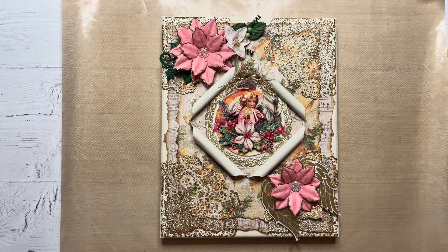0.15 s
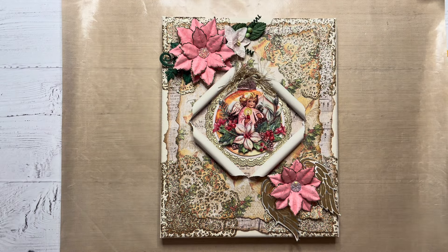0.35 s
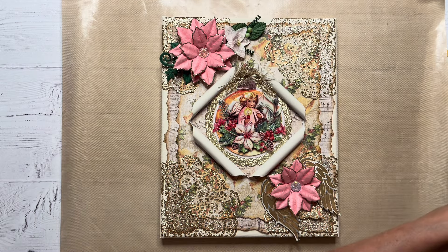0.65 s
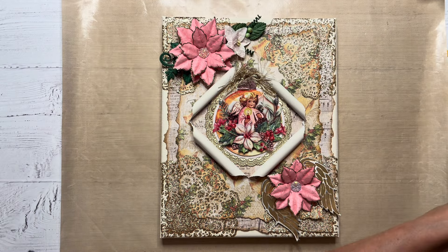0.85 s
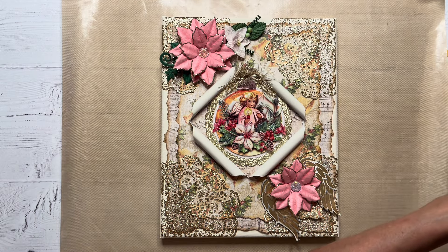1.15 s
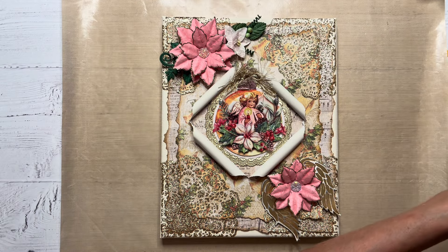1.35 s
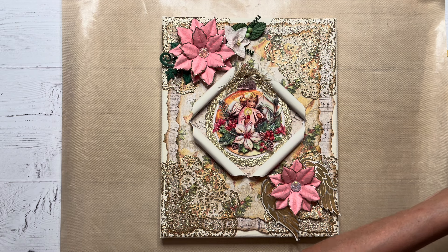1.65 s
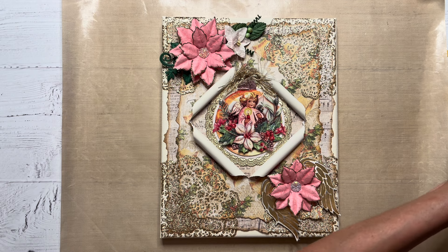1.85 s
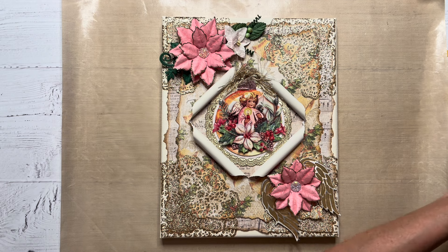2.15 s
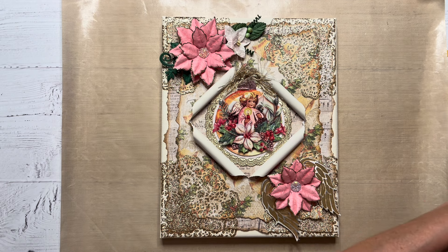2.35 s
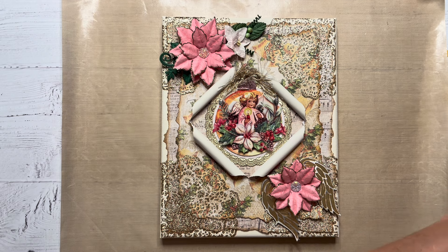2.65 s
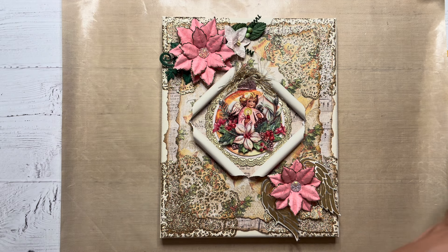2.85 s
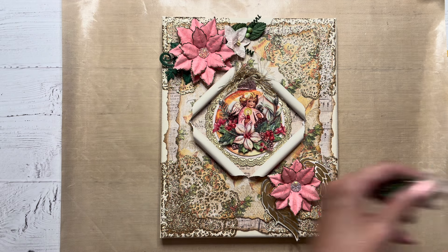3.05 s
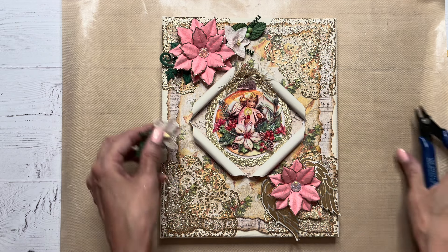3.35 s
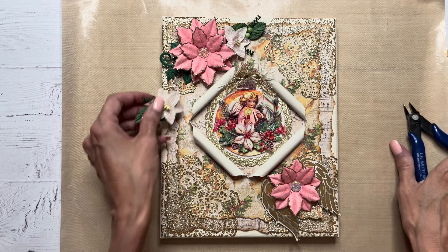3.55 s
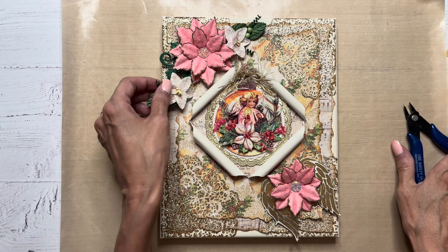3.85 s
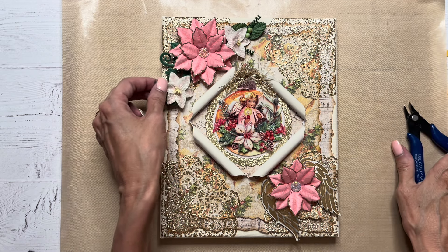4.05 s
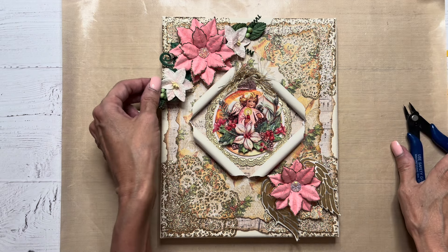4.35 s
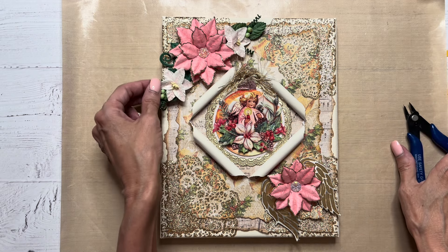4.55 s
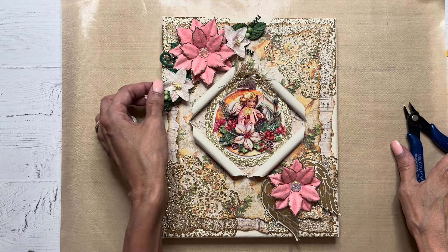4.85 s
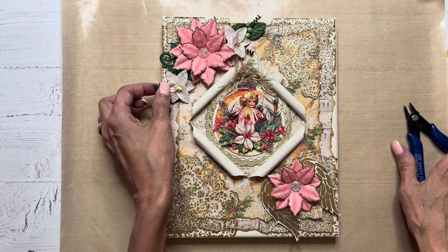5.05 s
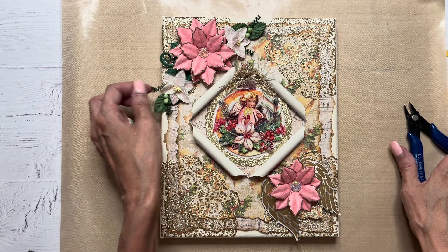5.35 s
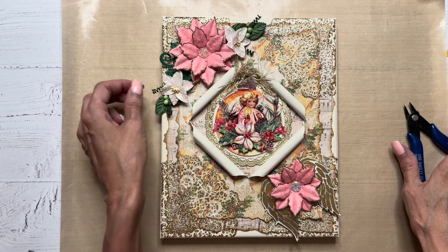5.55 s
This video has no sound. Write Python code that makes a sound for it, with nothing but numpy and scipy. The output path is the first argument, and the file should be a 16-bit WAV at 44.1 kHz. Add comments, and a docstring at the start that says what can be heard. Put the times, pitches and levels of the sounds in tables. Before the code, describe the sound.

Close above a craft table in a small furnished room with low ventilation rumble, fingers faintly rustle a fabric flower. Tiny ticks gather until cutters snap a wire stem with one loud, bright snip and short room tail. About a second later the tool is laid down with a duller, woody cluster of knocks and steel rattle, followed by very soft scraping on card.

```python
"""A quiet craft room, phone above the table. Fingers turn a fabric flower: uneven grains of filtered noise.
Cutter jaws bite its wire stem in small ticks, pitched or dry, and snap through with a falling ring and a grind.
The cutters are laid down (fading board modes, steel rattle) and the flower is nudged about on a card.
Ventilation rumbles throughout as steady noise; a small furnished room answers every hit with fading noise."""
import sys
import numpy as np
from scipy import signal
from scipy.fft import rfft, irfft, next_fast_len
from scipy.io import wavfile
from scipy.ndimage import uniform_filter1d

SR = 44100
rng = np.random.default_rng(int(sys.argv[2]) if len(sys.argv) > 2 else 0)


def unload_wav(signal):
    """Save mono or channel-first audio to the path in sys.argv[1] as 16-bit WAV at rate SR, clipped to [-1, 1]."""
    wavfile.write(
        sys.argv[1],
        SR,
        np.round(np.clip(np.atleast_2d(signal).T, -1, 1) * 32767).astype(np.int16),
    )


N = 251059
SIZE = next_fast_len(N + SR)  # room for the tails of the filters
HZ = np.arange(SIZE // 2 + 1) * SR / SIZE
T = np.arange(N) / SR

# strokes of the fingers over the flower, and at 3.958 s a brief hiss of the cutters' steel as they are laid
# down: start t/s, length/s, petal hiss level/dB, scrape level/dB
STROKES = [(0.0, 0.0076, -71, -69), (0.231, 0.078, -68.5, -70.5), (0.299, 0.038, -56.5, -71),
           (0.375, 0.043, -56.5, -65), (0.627, 0.034, -75, -79), (0.742, 0.061, -62, -68.5),
           (0.96, 0.076, -69, -78.5), (1.475, 0.022, -66, -79), (1.626, .12, -72, -81),
           (1.762, .13, -59.5, -63.5), (2.041, 0.05, -67.5, -70.5), (2.207, 0.14, -69, -68.5),
           (2.608, 0.025, -65.5, -75), (2.973, 0.037, -72.5, -69.5), (3.1, 0.055, -69.5, -74),
           (3.313, 0.037, -73, -65.5), (3.383, 0.072, -79.5, -64), (3.543, 0.06, -65.5, -67.5),
           (3.593, 0.024, -60, -63.5), (3.758, 0.073, -60.5, -66), (3.958, 0.0051, -65, -63),
           (4.026, 0.005, -64, -69.5), (4.22, 0.05, -88, -77), (4.409, 0.018, -86.5, -76),
           (4.66, 0.025, -78.5, -71), (4.76, 0.043, -83, -65), (4.873, 0.02, -72, -64.5),
           (5.12, 0.033, -84.5, -71), (5.325, 0.029, -70.5, -65.5), (5.391, 0.058, -72.5, -73.5)]


def undb(db):
    """Decibels to amplitude."""
    return 10 ** (np.asarray(db) / 20)


def over_hz(table):
    """A (f/Hz, value) table on every bin, straight on a log axis."""
    hz, value = np.transpose(table)
    return np.interp(np.log(HZ + 1), np.log(hz), value)


def shape(x, gain):
    """Filter by a gain on every bin."""
    return irfft(rfft(x, SIZE) * gain, SIZE)[..., :N]


def unit(x):
    """Scale to an RMS of one."""
    return x / np.sqrt(np.mean(x ** 2))


def colour(table):
    """A (f/Hz, level/dB) spectrum as gains that keep the power of white noise."""
    return unit(undb(over_hz(table)))


def burst(since, rise_s, t60):
    """Envelope of a short noise: quick rise, then fading."""
    return np.clip(since / rise_s, 0, 1) * undb(-60 * np.maximum(since, 0) / t60)


def ring(modes, since):
    """Fading sines, silent before the blow."""
    t = np.maximum(since, 0)
    return sum(undb(db - 60 * t / t60) * np.sin(2 * np.pi * hz * t) for hz, db, t60 in modes)


def grains(rate, spread_db, smear_s):
    """Rubbing: tiny catches of very uneven size, each smeared into a short puff of noise."""
    catch = (rng.random(N) < rate / SR) * undb(spread_db * rng.exponential(size=N))
    puff = signal.lfilter([1], [1, -np.exp(-1 / (smear_s * SR))], catch)
    # a steady floor keeps the rubbing from falling silent between catches
    return unit(puff + 0.54 * puff.mean()) * rng.standard_normal((2, N))


def diffuse(a, b):
    """Two unrelated sounds spread over both ports, as alike as sound from all sides arrives."""
    # likeness of the two microphone ports: f/Hz, likeness (0-1)
    alike = [(100, 1), (250, 0.99), (600, 0.4), (1100, 0), (1800, 1), (3000, 0.4), (5300, 0.5),
             (6000, 0.98), (7000, 0.5), (9000, 1), (12000, 1)]
    likeness = np.clip(over_hz(alike), 0, 1)
    common = shape(a, np.sqrt((1 + likeness) / 2))
    opposed = shape(b, np.sqrt((1 - likeness) / 2))
    return common + opposed * np.array([[1], [-1]])


def air():
    """Ventilation rumble and the faint hiss of the room: steady noise with a fixed spectrum."""
    # background spectrum: f/Hz, level/dB per Hz
    air_spectrum = [(25, -94.5), (50, -76), (80, -77.5), (110, -67.5), (138, -64), (163, -75.5), (190, -69),
                    (250, -82), (305, -76.5), (370, -90.5), (430, -84), (520, -91.5), (800, -95.5),
                    (1200, -103), (2500, -108), (4700, -123), (7000, -120), (11300, -120), (12600, -128),
                    (13400, -145)]
    noise = diffuse(*rng.standard_normal((2, N)))
    return shape(noise, undb(over_hz(air_spectrum)) * np.sqrt(SR / 2))


def strokes(level_db):
    """Level of the rubbing: every stroke rises, holds and falls; overlapping strokes add in power."""
    rise_db_s, fall_db_s = 603, 203.5  # a stroke catches quickly and dies away slowly
    power = np.zeros(N)
    for (start_s, length_s, _, _), db in zip(STROKES, level_db):
        before_db = np.maximum(rise_db_s * (start_s - T), 0)
        after_db = np.maximum(fall_db_s * (T - start_s - length_s), 0)
        power += undb(db - before_db - after_db) ** 2
    return np.sqrt(power)


def handling():
    """Fabric petals hiss under the fingers; wire and leaves scrape in a lower, wider band."""
    # hiss of the petals: f/Hz, level/dB
    petal_spectrum = [(3000, -30), (6000, -18), (8000, -8.5), (9300, 2.5), (10800, 4), (11800, -12.5),
                      (12600, -18), (13300, -46.5)]
    # scrape on skin and card: f/Hz, level/dB
    scrape_spectrum = [(1000, -20), (2500, -2), (4600, -9.5), (6000, -6), (7500, -1.5), (9500, -2.5),
                       (11800, -20.5), (13300, -35)]
    # from card_s on the flower rubs the card, which adds a resonance
    card_s, card_hz, card_width_hz, card_db = 3.94, 3800, 400, 6.5
    _, _, petal_db, scrape_db = np.transpose(STROKES)
    petals = shape(diffuse(*grains(350, 3.4, 0.0045)), colour(petal_spectrum))
    scrape = shape(diffuse(*grains(300, 2.8, 0.004)), colour(scrape_spectrum))
    card = shape(scrape, undb(card_db) / (1 + (2 * (HZ - card_hz) / card_width_hz) ** 2))
    scrape = scrape + (T > card_s) * card
    return petals * strokes(petal_db) + scrape * strokes(scrape_db)


def ticks():
    """A short pitched knock or a broad dry click, each with a burst of crackle."""
    # small pitched ticks of stem, jaws and petals, and at 3.958 s a low knock of the cutters laid on the table:
    # t/s, knock level/dB, knock f/Hz, crackle level/dB
    pitched = [(1.224, -57.5, 2210, -44), (1.46, -41, 2310, -26.5), (1.8348, -58, 2430, -38.5),
               (1.99, -56, 2410, -50), (2.2475, -36.5, 2120, -30.5), (2.258, -41, 2560, -37),
               (2.604, -50.5, 2130, -39.5), (2.617, -54, 1980, -42.5), (3.958, -50, 630, -46),
               (4.479, -60, 2000, -61), (4.745, -57, 2254, -60), (4.8736, -55, 3800, -51)]
    # dry clicks without a pitch: t/s, click level/dB, lower edge f/Hz, crackle level/dB
    dry_clicks = [(0.2264, -42, 2600, -43), (0.441, -54, 1500, -50), (1.748, -54, 1500, -40),
                  (1.8716, -59, 1800, -31), (2.0527, -53.5, 2300, -43), (2.189, -56.5, 2300, -53),
                  (2.224, -53.5, 2300, -54), (2.271, -40.5, 2100, -30.5), (2.3077, -44, 2097, -32),
                  (2.416, -60, 2000, -35), (2.836, -61, 1400, -41.5), (3.2969, -44, 1300, -46),
                  (3.3754, -41.5, 940, -42.5), (3.543, -52, 2100, -44), (3.557, -56, 1700, -38),
                  (4.936, -53, 600, -62)]
    # crackle: f/Hz, level/dB
    crackle_spectrum = [(2500, -21.5), (4200, -3.5), (6000, -7.5), (8000, 5.5), (9500, 17), (11200, 12),
                        (12500, -7.5), (15000, -31), (16500, -40)]
    swell_cycles = 1.7  # width of the knock's swell, alike on the way up and down
    reach = 2.6  # upper edge of a click as a multiple of the lower
    click_t60_s, crackle_t60_s = .008, .011
    knock, crackle = np.zeros(N), np.zeros(N)
    t = T[:1024]
    f = np.arange(len(t) // 2 + 1) * SR / len(t)
    events = pitched + dry_clicks
    noise = rng.standard_normal((len(events), 2, len(t)))
    for k, ((s, knock_db, hz, crackle_db), (crackle_noise, click_noise)) in enumerate(zip(events, noise)):
        i = int(s * SR)
        band = 1 / np.sqrt((1 + (hz / (f + 1)) ** 6) * (1 + (f / hz / reach) ** 4))
        hit = unit(irfft(rfft(click_noise) * band)) * burst(t, 0.0006, click_t60_s)
        if k < len(pitched):
            swell = np.exp(-.5 * (t * hz / swell_cycles - 1.6) ** 2)
            hit = swell * np.sin(2 * np.pi * hz * t) + undb(-7) * hit
        knock[i:i + len(t)] += undb(knock_db) * hit
        crackle[i:i + len(t)] += undb(crackle_db) * burst(t, 0.00089, crackle_t60_s) * crackle_noise
    return knock + shape(crackle, colour(crackle_spectrum))


def snip():
    """The wire parts and rings, the jaws slam: near sound on both ports, and the click sent into the room."""
    # bright grind of the closing jaws: f/Hz, level/dB
    slam_spectrum = [(3000, -36), (4400, -4), (5200, 3), (7000, 0), (8200, -3), (9200, -2), (11200, -2),
                     (11900, -17), (15500, -42)]
    # jolt in hands and handles: f/Hz, level/dB, t60/s
    thump_modes = [(447.6, -23, 0.0058), (680, -26, 0.0088), (1100, -26, 0.0095)]
    # the snap summed over all directions: f/Hz, level/dB
    snap_spectrum = [(300, -11.5), (1500, -16), (2200, 0), (3500, -5.5), (8000, -5), (11000, -5)]
    # two hard surfaces return the ring distinctly: delay t/s, level/dB
    ring_echoes = [(.0103, -19), (.0130, -20)]
    snip_s, snap_db = 2.31945, 5
    whip_db, whip_hz, whip_drop_hz, whip_t60_s = 2.5, 2480, 1300, .0062  # whip_hz is the end pitch
    slam_db, slam_s = -9.5, .0013  # level and swell time
    mat_echo_s, mat_echo_db = .0014, -5.5
    t = np.maximum(T - snip_s, 0)
    # tension is gone at once, so the pitch drops within a few cycles
    turns = whip_hz * t + whip_drop_hz * 0.00044 * (1 - np.exp(-t / 0.00043))
    whip = undb(whip_db) * burst(t, .0005, whip_t60_s) * np.sin(2 * np.pi * turns)

    grind = shape(rng.standard_normal(N), colour(slam_spectrum))
    swell = np.clip(t / slam_s, 0, 1) ** 2 * undb(-60 * np.maximum(t - slam_s, 0) / 0.0014)
    linger = undb(-18.5) * burst(t, slam_s, 0.026)
    slam = undb(slam_db) * grind * (swell + linger)

    echo = np.roll(slam + 0.14 * whip, int(mat_echo_s * SR)) * undb(mat_echo_db)
    for delay_s, db in ring_echoes:
        echo = echo + undb(db) * np.roll(whip, int(delay_s * SR))
    # the hands sit to one side of the phone's ports
    thump = ring(thump_modes, t - .0015) * undb([[0], [-9.0]])
    click = shape(np.arange(N) == int(snip_s * SR), undb(snap_db + over_hz(snap_spectrum)))
    return whip + slam + echo + thump, click


def knocks():
    """Steel rattles through the air at once; in the board bending waves travel slower the lower they are."""
    # cutters laid on the table: t/s, blow level/dB, steel level/dB, travel in the board/(s x root Hz),
    # contact/ms, favoured pitch of this spot f/Hz
    blows = [(3.4742, -30, -42, .085, 0.16, 480), (3.6475, -22, -34.5, 0.059, 0.39, 2080),
             (3.6958, -22.5, -35.5, 0.045, 0.1, 1446), (3.6985, -28, -56, 0.03, 0.18, 550),
             (3.731, -30.5, -46, 0.055, 0.42, 1785)]
    # modes of the table top: f/Hz, level/dB, t60/s
    board_modes = [(88.45, -12.5, 0.24), (332, -7.5, 0.04), (416, -8, 0.035), (530, -8.5, 0.04),
                   (612, -19.5, 0.068), (824, -8, 0.024), (1142, -6, 0.013), (1341.3, -1.5, 0.010),
                   (1730, -11, 0.012), (2096.4, -7.5, 0.011)]
    # handles and joint: f/Hz, level/dB
    steel_spectrum = [(2500, -6), (3500, -9.5), (4300, -2.5), (6000, -22), (7600, -11), (10300, -4),
                      (11800, -30), (13000, -54)]
    favour_db, favour_oct = 7.5, 0.222  # lift of the modes near the favoured pitch, and its reach
    joint_hz, joint_width_hz, joint_db = 3750, 220, 25
    board, steel, joint = 0, 0, 0
    # each spot excites the modes differently
    share = rng.normal(0, 1.5, (len(blows), len(board_modes)))
    for (s, blow_db, steel_db, travel, contact_ms, favour_hz), own_db in zip(blows, share):
        excited = []
        for (hz, db, t60), spot_db in zip(board_modes, own_db):
            lift_db = favour_db * np.exp(-.5 * (np.log2(hz / favour_hz) / favour_oct) ** 2)
            excited.append((hz, db + spot_db + blow_db + lift_db, t60))
        modes = ring(excited, T)
        # the blow, then the loose tool chatters on the surface
        chatter = shape(grains(300, 3.0, 0.001)[0], HZ / (HZ + 150) / (1 + (HZ / 700) ** 3))
        push = (np.arange(N) == int(s * SR)) + undb(-25.0) * burst(T - s, 0.0047, 0.116) * chatter
        soft = 1 / (1 + (HZ * contact_ms / 1000) ** 4)  # a longer push drives less treble
        travelled = np.exp(-4j * np.pi * travel * np.sqrt(HZ))  # delay of travel / root Hz
        board = board + shape(modes, rfft(push, SIZE) * soft * travelled)
        rattle = burst(T - s, 0.00022, 0.018) + undb(-16.0) * burst(T - s, 0.003, 0.08)
        steel = steel + undb(steel_db) * rattle
        # the loose joint sings on, growing with the square of the steel's level
        joint = joint + undb(2 * steel_db + joint_db) * burst(T - s, 0.0039, 0.095)
    # a small top radiates no deep bass
    board = signal.sosfilt(signal.butter(4, 66, "high", fs=SR, output="sos"), board)
    resonance = 1 / (1 + (2 * (HZ - joint_hz) / joint_width_hz) ** 2)
    song = unit(shape(grains(150, 3.0, 0.002)[0], resonance))
    return board + steel * shape(rng.standard_normal(N), colour(steel_spectrum)) + joint * song


def room(x):
    """Scattered returns of walls and furniture: noise that swells in, then fades band by band."""
    # decay of the room: f/Hz, t60/s
    room_t60 = [(100, 0.43), (1000, 0.25), (4000, 0.32), (12000, 0.2)]
    # what the furnishings return: f/Hz, level/dB
    soft_return = [(200, -0.5), (11500, 0), (12800, -15), (13600, -40)]
    wall_s = 0.008  # returns from walls and furniture reach full level by then
    lump_db, lump_s, mixed_s = 3.2, 0.0018, 0.1  # early returns come in lumps, which even out over mixed_s
    t = T[:SR // 2]
    log_hz, t60_s = np.transpose([(np.log(f), s) for f, s in room_t60])
    tail = 0
    for hz in 88 * 2 ** np.arange(8):
        band = np.exp(-.5 * (np.log2((HZ + 1) / hz) / .5) ** 2)
        noise = shape(rng.standard_normal((2, len(t))), band)[:, :len(t)]
        tail = tail + noise * undb(-60 * t / np.interp(np.log(hz), log_hz, t60_s))
    k = int(lump_s * SR)
    lumps = unit(uniform_filter1d(uniform_filter1d(rng.standard_normal(len(t)), k), k))
    tail = tail * undb(lump_db * lumps * np.exp(-t / mixed_s))
    tail = tail * np.clip(t / wall_s, 0, 1) ** 4
    tail = tail / np.sqrt(np.sum(tail ** 2) / 2)
    return diffuse(*shape(x, undb(over_hz(soft_return)) * rfft(tail, SIZE)))


def scene():
    """Near sounds at the table, plus the room's answer to ticks, snap and knocks."""
    tick, (cut, click), knock = ticks(), snip(), knocks()
    wet = room(undb(-13.0) * tick + click + undb(-9) * knock)
    return air() + handling() + tick + cut + knock + wet


def record(dry):
    """The phone's two ports differ in phase, band by band, and slightly in level; the top is cut."""
    # phase by which the left port leads: f/Hz, lead/radians
    port_lead = [(0, 0), (1500, 0.0), (2500, .7), (4000, .9), (4800, 3.0), (5300, 5.0), (5900, 6.2),
                 (8500, 9.2), (9300, 9.6), (11500, 11.6), (12000, 12.5), (13500, 12.9), (16000, 15.0)]
    top_hz = 16200
    hz, lead = np.transpose(port_lead)
    turn = np.exp(.5j * np.interp(HZ, hz, lead) * np.array([[1], [-1]]))
    ports = shape(dry, turn) * undb([[-.25], [.25]])
    return signal.sosfilt(signal.ellip(8, .2, 70, top_hz, fs=SR, output="sos"), ports)


dry = scene()
out = record(dry)
unload_wav(out)
```